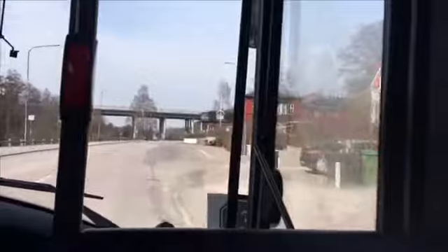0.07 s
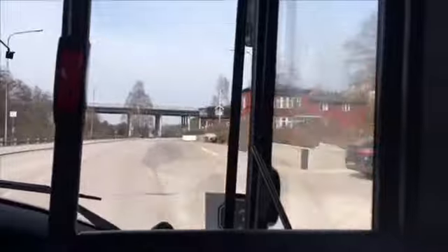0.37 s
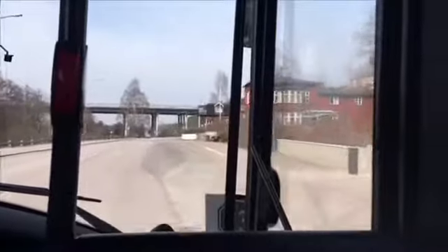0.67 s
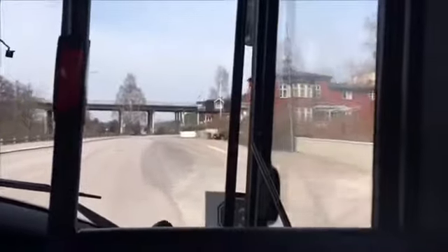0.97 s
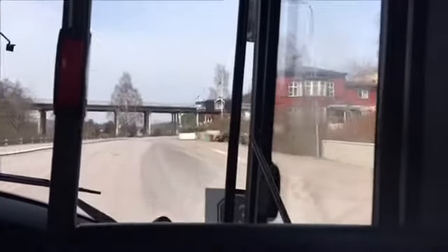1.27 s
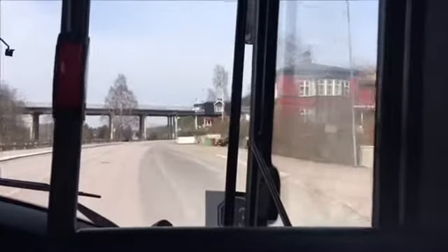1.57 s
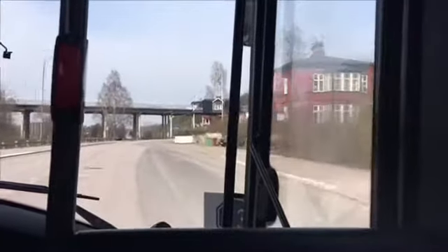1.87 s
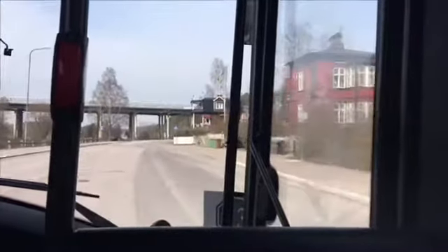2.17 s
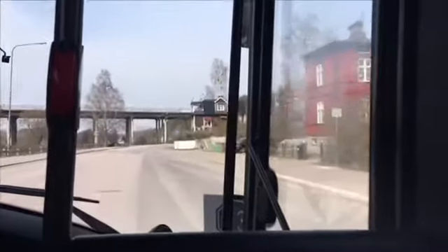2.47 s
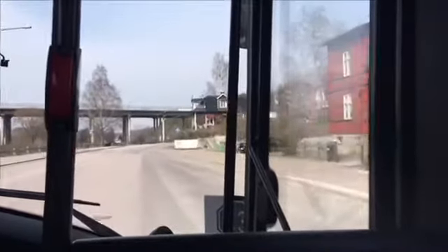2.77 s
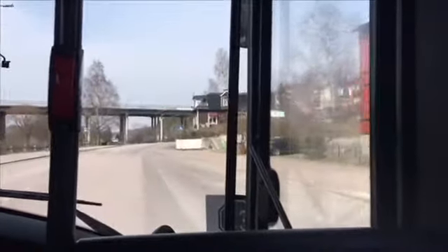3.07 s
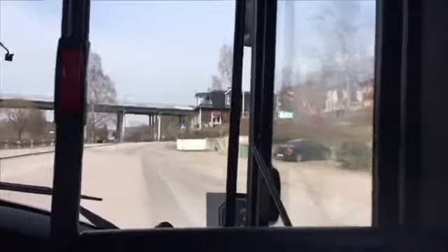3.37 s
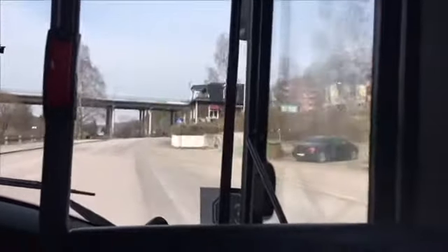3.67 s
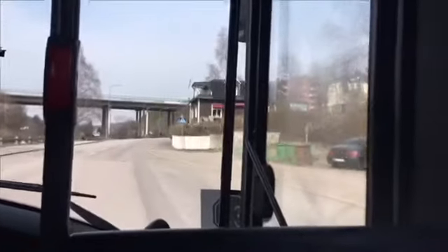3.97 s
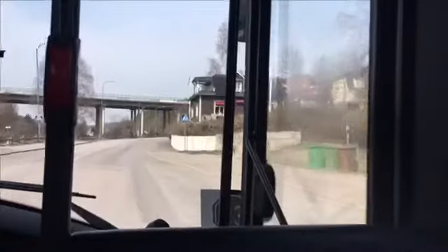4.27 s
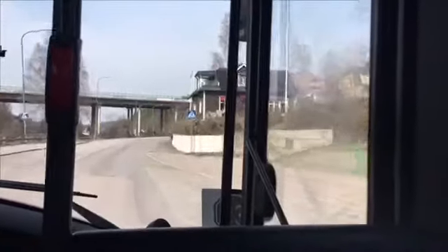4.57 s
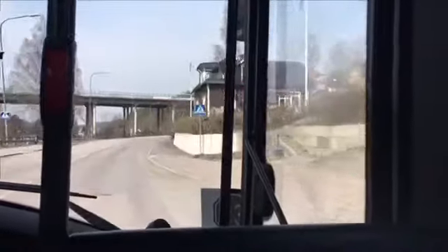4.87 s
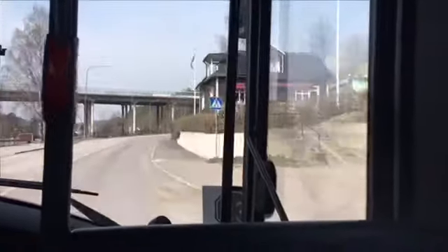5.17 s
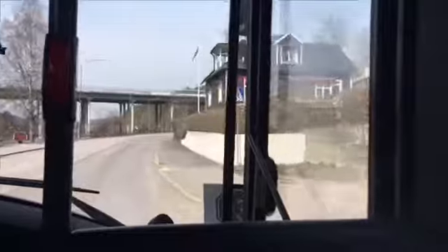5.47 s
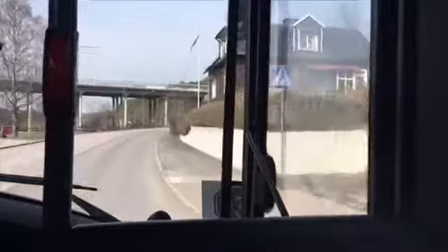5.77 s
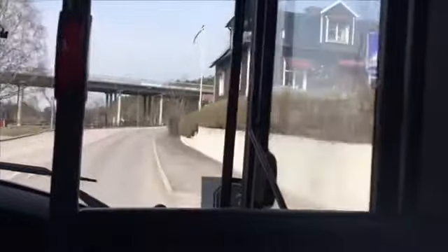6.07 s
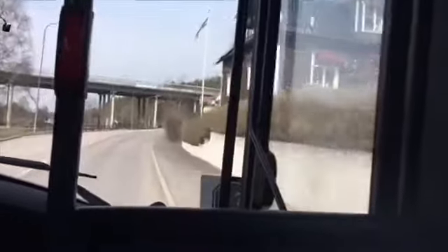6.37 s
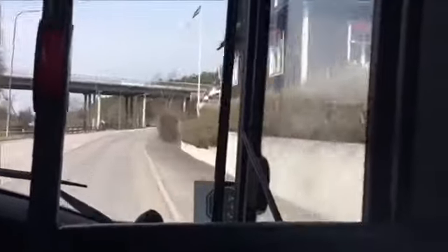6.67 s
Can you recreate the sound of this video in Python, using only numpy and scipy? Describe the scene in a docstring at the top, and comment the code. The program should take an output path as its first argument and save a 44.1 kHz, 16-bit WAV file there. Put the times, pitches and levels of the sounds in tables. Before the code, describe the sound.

A bus is heard from inside, near the front door, moving at a steady speed for about seven seconds. The engine's deep, throbbing drone runs throughout, blended with road rumble, tyre roar and a faint whine of turning parts. Loose door panels and trim tick and chatter in short, irregular bursts. At about 1.2 seconds a dull thump comes through the floor. The engine swells slightly around 1.7 and 2.7 seconds. From 3 to 4 seconds the bus crosses a rough patch: the door clatters harder, its seals give tiny high squeaks, and a few heavy thumps land near 3.8 seconds. The ride then smooths out, with sharper single rattles at about 5.1 and 5.9 seconds. Around 6.6 seconds come a low heave, one short squeak and more rattling as the drone continues.

```python
"""A bus engine booms in the cabin at steady speed, heard from a seat near the front door.
The road rumbles, the tyres roar, two panel tones throb together and turning parts whine faintly.
The loose door and trim knock and chatter as the body shakes, the door seals chirp as they stick
and slip, and the wheels thump through the floor, hardest over a rough patch in the middle."""
import sys
import numpy as np
from scipy import signal
from scipy.fft import rfft, irfft, next_fast_len
from scipy.io import wavfile
from scipy.ndimage import uniform_filter1d

SR = 44100
rng = np.random.default_rng(int(sys.argv[2]) if len(sys.argv) > 2 else 0)


def transcribe(signal):
    """Save signal, clipped to [-1, 1], as a 16-bit WAV file at the path in sys.argv[1]."""
    frames = np.atleast_2d(signal).T
    limited = np.clip(frames, -1, 1)
    pcm = np.round(limited * 32767).astype(np.int16)
    wavfile.write(sys.argv[1], SR, pcm)


N = 305613
T = np.arange(N) / SR


def amp(db):
    """Turns decibels into a number to multiply by."""
    return 10 ** (np.asarray(db) / 20)


def unit(x):
    """Scales a signal to an average (rms) level of one."""
    return x / np.sqrt(np.mean(x ** 2) + 1e-20)


def at_peak(x, db):
    """Scales a burst so that its loudest few milliseconds have this level."""
    return x * amp(db) / np.sqrt(uniform_filter1d(x ** 2, size=320).max() + 1e-20)


def follow(rows):
    """Joins (time_s, value) points with straight lines, one value per sample."""
    return np.interp(T, *np.transpose(rows))


def swell(peak_s, half_width_s):
    """A smooth rise from zero to one and back."""
    return np.exp(-((T - peak_s) / half_width_s) ** 2)


def add(mix, start_s, sound):
    """Lays a sound into the mix at a time."""
    part = mix[max(round(start_s * SR), 0):][:len(sound)]
    part += sound[:len(part)]


def colour(points, resonances, hz):
    """The level in dB at each pitch: a smooth curve with peaks where a body rings."""
    point_hz, db = np.transpose(points)
    smooth = np.interp(np.log(hz + 1), np.log(point_hz + 1), db)
    peaks = sum(lift / (1 + (2 * (hz - centre) / width) ** 2) for centre, width, lift in resonances)
    return smooth + peaks


def shaped_noise(gain_at):
    """Steady noise whose strength at each pitch is gain_at(hz)."""
    size = next_fast_len(N)
    hz = np.fft.rfftfreq(size, 1 / SR)
    return unit(irfft(rfft(rng.standard_normal(size)) * gain_at(hz), size)[:N])


def noise(points, resonances):
    """Steady noise of a given tone colour."""
    return shaped_noise(lambda hz: amp(colour(points, resonances, hz)))


def wander(rate_hz):
    """A slow random wobble, up to about this rate."""
    return shaped_noise(lambda hz: np.exp(-(hz / rate_hz) ** 2))


def ring(points, resonances, size=2048):
    """How a body of this tone colour rings after one click."""
    hz = abs(np.fft.fftfreq(size, 1 / SR))
    log_gain = np.log(amp(colour(points, resonances, hz)))
    spectrum = np.exp(np.conj(signal.hilbert(log_gain)))  # puts the ringing after the click
    return np.fft.ifft(spectrum).real[:size // 2]


def knock(points, resonances):
    """A body's ring after one knock, with the treble above about 15 kHz filtered off."""
    return signal.sosfilt(signal.butter(5, 15200, fs=SR, output="sos"), ring(points, resonances))


def cabin_echo(direct, early_s, late_s, late_db):
    """Direct sound, close echoes off the glass and a tail; each echo fades 60 dB in its given time."""
    t = np.arange(12000) / SR
    echo = rng.standard_normal(len(t)) * (amp(-60 * t / early_s) + amp(late_db - 60 * t / late_s))
    echo /= np.linalg.norm(echo)
    echo[0] += direct
    return echo


# How often the engine fires: time_s, firing_hz
ENGINE_SPEED = [(0, 81), (1.8, 81.6), (3.2, 80), (3.9, 77.3), (5.0, 80.2), (5.6, 78.6), (6.93, 81.3)]
# How loud the firing note is; the driver eases off over the rough patch: time_s, level_db
ENGINE_LOAD = [(0, -24), (1.1, -27.5), (1.7, -21), (2.3, -28.5), (2.7, -21), (3.3, -31.5), (3.75, -24.5),
               (4.3, -30), (5.1, -27), (6.2, -26), (6.93, -30)]
# The engine's tones: cycles_per_turn, relative_db
ENGINE_TONES = [(1, -18), (2, -12.5), (3, -1), (4.5, -14.5), (6, -16), (8, -22.5)]


def engine(firings_per_turn=3):
    """Low tones follow the turning crankshaft, each throbbing as the fuel burns unevenly."""
    turns = np.cumsum(follow(ENGINE_SPEED)) / SR / firings_per_turn
    tones = np.zeros(N)
    for cycles, db in ENGINE_TONES:
        throb = 1 + 0.68 * wander(9.7)
        tones += amp(db) * throb * np.sin(2 * np.pi * (cycles * turns + rng.random()))
    return np.sqrt(2) * amp(follow(ENGINE_LOAD) + 1) * tones


def rough_tone(pitch_hz, rough, width_hz, beating=1):
    """A tone blurred by vibration, so its level and pitch waver."""
    blur = 1 + rough * (wander(width_hz) + 1j * wander(width_hz))
    return unit((beating * blur * np.exp(2j * np.pi * (pitch_hz * T + rng.random()))).real)


def panel_hum(beat_hz=5.09, in_step_s=3.73, partner_db=-2.5):
    """Two close panel tones drift in and out of step, throbbing about five times a second."""
    beating = 1 + amp(partner_db) * np.exp(-2j * np.pi * beat_hz * (T - in_step_s))
    return amp(-27) * rough_tone(132.96, rough=0.13, width_hz=3, beating=beating)


# How the axle whine rises and falls: time_s, relative_db
AXLE_WHINE = [(0, -39.5), (3.5, -35.5), (4.5, -46), (6.2, -43.5), (6.93, -43)]
# How the pump whine rises and falls: time_s, relative_db
PUMP_WHINE = [(0, -37), (1.5, -44), (5.2, -44), (6.93, -42)]
# Swells added to the faint, steady gear whine: peak_s, half_width_s, level_db
GEAR_WHINE = [(2.4, 0.24, -44), (5.54, 0.24, -44.5), (6.55, .12, -37)]


def whines(gear_rest_db=-49.5):
    """The turning axle, gears and pump each sing one faint tone."""
    swells = sum(amp(db) * swell(peak_s, half_width_s) for peak_s, half_width_s, db in GEAR_WHINE)
    axle = amp(follow(AXLE_WHINE) - 1) * rough_tone(291.5, rough=0.52, width_hz=6.1)
    gear = (amp(gear_rest_db) + swells) * rough_tone(768, rough=0.66, width_hz=16)
    pump = amp(follow(PUMP_WHINE) - 5) * rough_tone(962, rough=2.7, width_hz=20)
    return axle + gear + pump


# How hard the road shakes the bus: time_s, level_db
BODY_SHAKE = [(0, -55), (1.2, -64), (2.7, -69), (3.25, -43.5), (3.48, -42.5), (3.6, -56), (3.8, -35.5),
              (3.95, -39), (4.2, -63), (6.3, -53), (6.75, -46.5), (6.93, -47)]


def shaken(smooth_db, share_db, flutter_db, flutter_hz):
    """A road noise's strength: its smooth-road level plus a share of the shaking, with random flutter."""
    strength = amp(smooth_db) + amp(follow(BODY_SHAKE) + share_db)
    return strength * amp(flutter_db * wander(flutter_hz))


# Tone colours of the suspension, body, tyres and air: pitch_hz, relative_db
SUSPENSION_COLOUR = [(14, -55), (21, -22), (27, -14), (31, -13), (38, 3.5), (47, -6.5), (58, 1.5), (80, -1),
                     (97, 1.5), (125, -18.5), (160, -25), (300, -57)]
BODY_COLOUR = [(60, -37), (95, 2), (120, 3), (150, 1), (180, -7), (230, -2), (265, -7.5), (320, -10),
               (400, -12), (520, -33.5), (900, -87)]
TYRE_COLOUR = [(200, -15.5), (420, -1), (500, -2.5), (700, -1), (850, -4), (1050, -6), (1300, -9.5),
               (1700, -16), (2400, -22), (3300, -34.5), (5000, -40.5), (15000, -63)]
AIR_COLOUR = [(1000, -3), (3000, 22), (4400, 12), (5000, -21), (6100, 15), (7700, -32), (9200, 12),
              (10400, -17), (12500, -6), (14500, -19)]
# Pitches at which the cabin rings: pitch_hz, width_hz, boost_db
CABIN_RINGS = [(26.7, 3.5, 21), (59.5, 17, 7.5), (75.4, 14, 2), (124.5, 12.6, 2.5), (203.2, 17, 5.5),
               (233.3, 6.2, 3.5), (309, 8.7, 7.5), (340, 8.2, 1), (572, 23, 5), (661, 15, 7), (712, 46, 2),
               (1267, 19, 3.5)]
# Tyre roar as the asphalt changes, before shaking is added: time_s, level_db
TYRE_ROAR = [(0, -33.5), (1.2, -33.5), (3.4, -33), (4.4, -34), (5.2, -33.5), (6.93, -34.5)]
# Dips in the road that heave the bus: peak_s, half_width_s, thud_db, boom_db
ROAD_DIPS = [(1.2, 0.13, -30, -35), (3.83, 0.19, -30, -36), (4.71, 0.063, -45, -27), (6.55, 0.16, -26, -59)]


def road():
    """The road shakes the cabin air through suspension, body and tyres; air hisses at the door seals."""
    thud = shaken(smooth_db=-26, share_db=5, flutter_db=0, flutter_hz=11)
    boom = shaken(smooth_db=-24.5, share_db=-7.5, flutter_db=0.5, flutter_hz=4.4)
    roar = shaken(smooth_db=follow(TYRE_ROAR), share_db=-20, flutter_db=0.46, flutter_hz=5.2)
    for peak_s, half_width_s, thud_db, boom_db in ROAD_DIPS:
        heave = swell(peak_s, half_width_s)
        thud += amp(thud_db) * heave
        boom += amp(boom_db) * heave
    suspension = thud * noise(SUSPENSION_COLOUR, CABIN_RINGS)
    body = boom * noise(BODY_COLOUR, CABIN_RINGS)
    tyres = roar * noise(TYRE_COLOUR, CABIN_RINGS)
    air = amp(-58.5) * noise(AIR_COLOUR, [])
    return suspension + body + tyres + air


# Tone colour of a knock on the door: pitch_hz, relative_db
DOOR_COLOUR = [(250, -16), (450, 10), (800, 9), (1200, 12), (2000, 4), (3000, 2), (4800, -4.5),
               (6300, -6.5), (10000, -16.5), (14000, -17)]
# Pitches at which the loose door and trim ring: pitch_hz, width_hz, boost_db
PANEL_RINGS = [(2230, 200, 2), (2810, 240, 6), (3580, 160, 5.5), (4400, 200, 2), (5540, 200, 3.5),
               (6100, 370, 6), (6800, 300, 2), (8490, 240, 6), (9480, 340, 4), (11200, 600, 2)]


def door_clatter(per_s=260):
    """The door leaves jostle in their frame: a dense spray of knocks, louder on rough road."""
    contacts = (rng.random(N) < per_s / SR) * amp(1.5 * np.minimum(rng.exponential(1, N), 3))
    echo = cabin_echo(direct=0.84, early_s=0.22, late_s=0.17, late_db=4)
    one_knock = np.convolve(knock(DOOR_COLOUR, PANEL_RINGS), echo)
    return amp(follow(BODY_SHAKE)) * unit(signal.oaconvolve(contacts, one_knock)[:N])


# Tone colour of a tap on the trim, the cabin's lining and fittings: pitch_hz, relative_db
TRIM_COLOUR = [(500, -17), (1200, -1), (2200, 4.5), (3200, 2.5), (4800, -0.5), (6200, -2), (7800, -3),
               (9000, -1.5), (10300, -4.5), (12000, -1.5), (14000, -7)]


def ticks(per_s=24):
    """Small fittings tick faintly at random all round the cabin."""
    contacts = (rng.random(N) < per_s / SR) * amp(0.83 * np.minimum(rng.exponential(1, N), 2.5))
    echo = cabin_echo(direct=0.25, early_s=0.08, late_s=0.22, late_db=-10)
    one_tick = np.convolve(knock(TRIM_COLOUR, PANEL_RINGS), echo)
    return amp(-62) * unit(signal.oaconvolve(contacts, one_tick)[:N])


def chatter(db, length_s, low_boost_db, count=24, fade_db=-5):
    """A loose part makes a quick run of fading taps; each rings the trim and the cabin."""
    tap_s = (np.arange(count) + rng.random(count)) / count * np.clip(length_s, 0.002, 0.08)
    force = amp(fade_db * tap_s / tap_s[-1]) * rng.standard_normal(count)
    force[0] = 1.2  # a firm first tap
    contacts = np.zeros(SR // 12)
    np.add.at(contacts, (tap_s * SR).astype(int), force)
    own_rings = [(hz, 350, 3) for hz in rng.uniform(2500, 7500, size=3)]  # no two parts ring alike
    echo = cabin_echo(direct=0.29, early_s=0.08, late_s=0.35, late_db=-7.5)
    taps = signal.fftconvolve(contacts, knock(TRIM_COLOUR, PANEL_RINGS + own_rings))
    burst = at_peak(signal.fftconvolve(taps, echo), db)
    low = signal.sosfiltfilt(signal.butter(2, 4800, fs=SR, output="sos"), burst)
    return amp(low_boost_db) * low + (burst - low)


# The loud rattles: start_s, level_db (before the boost), length_s, low_boost_db
# Heavier parts knock lower, so they get more boost below 4800 Hz.
LOUD_RATTLES = [(.048, -43.5, 0.012, 3), (.143, -48.5, .008, -9), (0.223, -47.5, .035, 2),
                (.415, -48, .025, 4), (0.486, -50, 0.063, 0), (.785, -41.5, 0.013, 2),
                (.861, -44.5, 0.013, -2), (.963, -42.5, 0.051, 0.5), (1.129, -41, 0.039, -3.5),
                (1.235, -49.5, 0.035, 2), (1.339, -42, 0.021, -1), (1.466, -47.5, 0.027, 2),
                (1.55, -48.5, 0.052, 2), (1.66, -48.5, .03, 1.5), (1.732, -49, 0.01, 4),
                (1.801, -47.5, .011, -7), (2.002, -46.5, 0.015, -7), (2.253, -44, 0.018, 0.5),
                (2.314, -44.5, 0.021, 1), (3.098, -40.5, 0.018, -0.5), (3.169, -45, 0.023, -8),
                (3.227, -40.5, .035, 2), (3.289, -44, .049, -8), (3.349, -37, 0.054, -7),
                (3.451, -36, .01, -11), (3.489, -44, .02, 1), (3.598, -46, .038, -1),
                (3.644, -34, 0.012, -5), (3.7, -41, 0.049, -10), (3.743, -29.5, 0.033, -7),
                (3.785, -42.5, .037, 7), (3.829, -34, 0.025, -6), (3.88, -43, 0.023, -1),
                (3.925, -31, 0.028, -7), (4.089, -35.5, .014, -5), (4.175, -46.5, 0.025, -2),
                (4.309, -46, 0.015, 3), (4.373, -49.5, 0.021, 6.5), (4.688, -44.5, 0.011, 2),
                (4.73, -44.5, 0.012, 7), (4.816, -44, .008, -1), (4.847, -46, 0.013, 4),
                (4.9, -46, .06, 4.5), (5.134, -34, 0.022, -5), (5.434, -38.5, 0.023, 0),
                (5.482, -43, .017, 1), (5.681, -44.5, 0.024, 2), (5.736, -47.5, .007, 8.5),
                (5.816, -43.5, 0.019, 2), (5.854, -32.5, 0.0081, -1.5), (5.968, -50.5, .015, 7.5),
                (6.04, -43.5, .02, -2), (6.121, -46.5, 0.012, 0), (6.18, -48.5, 0.011, 3),
                (6.228, -40.5, 0.013, -0.5), (6.328, -45.5, .009, -5), (6.376, -43, 0.014, -4),
                (6.42, -45.5, 0.026, 5), (6.765, -39, 0.029, 1.5), (6.835, -46.5, 0.02, 5.5),
                (6.886, -39.5, 0.033, -1.5)]


def loud_rattles():
    """Loose parts of the door and trim chatter in short bursts."""
    out = np.zeros(N)
    for start_s, db, length_s, low_boost_db in LOUD_RATTLES:
        add(out, start_s, chatter(db, length_s, low_boost_db))
    return out


def faint_rattles(per_s=5, typical_db=-54, spread_db=2.5, length_s=0.012):
    """Small parts chatter by chance all along the way, a little louder when the bus shakes more."""
    out, shake_db = np.zeros(N), follow(BODY_SHAKE)
    level_db = typical_db + 0.38 * (shake_db - shake_db.mean())
    for slot in range(int(per_s * T[-1])):
        place, stretch = rng.random(2)
        softness, weight = rng.standard_normal(2)
        start_s = (slot + place) / per_s
        db = np.interp(start_s, T, level_db) - spread_db * softness
        add(out, start_s, chatter(db, length_s * (0.5 + stretch), low_boost_db=3 * weight))
    return out


# Chirps of the door seals: start_s, length_s, start_hz, end_hz, level_db, overtones_db
SEAL_CHIRPS = [(0.43, .013, 3400, 3520, -43.5, -17), (3.169, 0.033, 4150, 4280, -40, -1),
               (3.177, .014, 3900, 3450, -41, -12), (3.231, .016, 2660, 3330, -43, -16),
               (3.379, 0.017, 3130, 2630, -40, -11), (3.779, 0.077, 2944, 2920, -40, -7),
               (3.939, 0.03, 3160, 3170, -38, -8), (4.853, 0.0134, 3180, 3470, -43.5, -5),
               (4.919, 0.022, 5600, 5830, -44, -2), (5.486, 0.03, 6300, 6840, -40.5, -9),
               (6.628, 0.033, 2917, 2843, -35, -20.5)]


def seal_chirps(flutter_db=2.5, fade_db=-4):
    """Door seals stick and slip: a short rough tone that slides and settles, echoed by the cabin."""
    out = np.zeros(N)
    for start_s, length_s, start_hz, end_hz, db, overtones_db in SEAL_CHIRPS:
        progress = np.linspace(0, 1, int(length_s * SR))
        slips = unit(uniform_filter1d(rng.standard_normal(SR // 10), size=40))[:len(progress)]
        slide_hz = end_hz + (start_hz - end_hz) * (1 - progress) ** 2
        phase = 2 * np.pi * np.cumsum(slide_hz * (1 + 0.017 * slips)) / SR
        harmonics_db = [0, overtones_db, overtones_db - 8]
        tone = sum(amp(level) * np.sin(k * phase) for k, level in enumerate(harmonics_db, 1))
        echo = cabin_echo(direct=1, early_s=0.1, late_s=0.27, late_db=-6)
        grip = signal.windows.tukey(len(progress), 0.2) * amp(flutter_db * slips + fade_db * progress)
        add(out, start_s, at_peak(signal.fftconvolve(tone * grip, echo), db))
    return out


# Tone colour of a blow to the floor: pitch_hz, relative_db
FLOOR_COLOUR = [(60, 2), (200, -12), (450, 2), (750, -3.5), (1100, -6.5), (1800, -15), (4000, -32)]
# Blows to the floor: start_s, level_db
FLOOR_THUMPS = [(1.152, -27.5), (3.79, -25), (3.845, -29), (3.93, -36)]


def floor_thumps():
    """The wheels drop and the suspension hits its stops, sending dull blows through the floor."""
    out, floor = np.zeros(N), ring(FLOOR_COLOUR, CABIN_RINGS)
    for start_s, db in FLOOR_THUMPS:
        echo = cabin_echo(direct=0.36, early_s=0.35, late_s=0.3, late_db=-10)
        add(out, start_s, at_peak(signal.fftconvolve(floor, echo), db))
    return out


def scene():
    """Everything heard at one seat, in one channel."""
    drive = engine() + panel_hum() + whines() + road() + floor_thumps()
    return (drive + loud_rattles() + door_clatter() + ticks() + seal_chirps() + faint_rattles())[None]


def record(dry, cutoff_hz=15750, fade_s=0.004):
    """Softens both ends and removes the very highest treble."""
    fade = np.clip(np.minimum(T, T[-1] - T) / fade_s, 0, 1)
    low_pass = signal.firwin(511, cutoff_hz, window=("kaiser", 9), fs=SR)
    return signal.oaconvolve(dry * fade, low_pass[None], "same")


dry = scene()
out = record(dry)
transcribe(out)
```